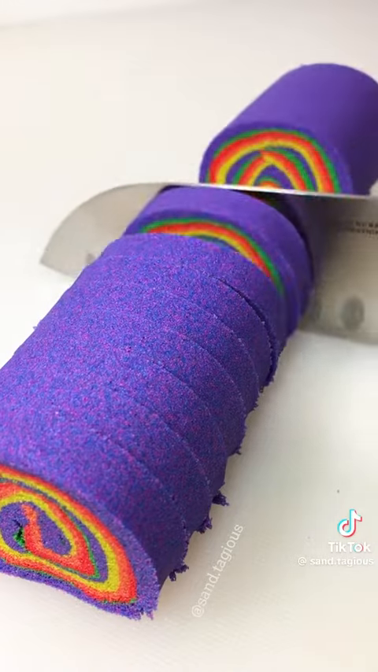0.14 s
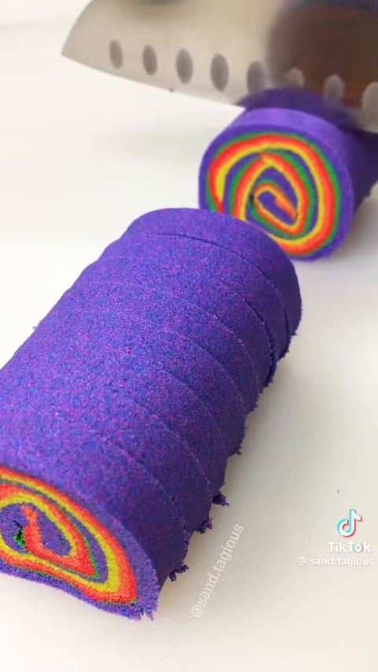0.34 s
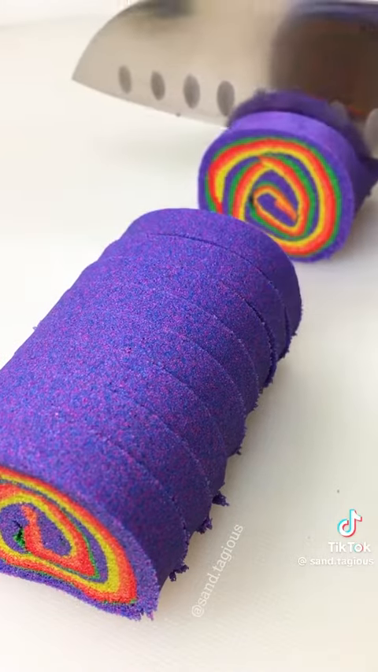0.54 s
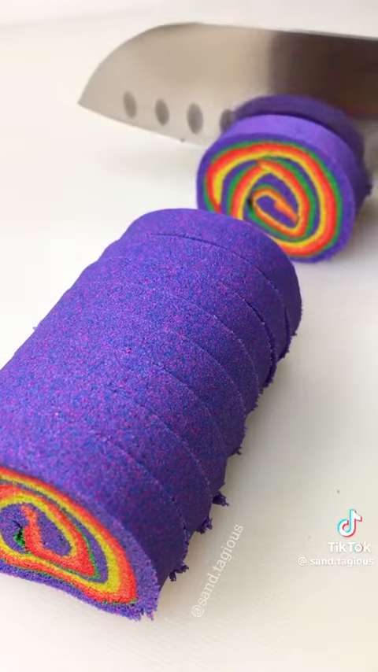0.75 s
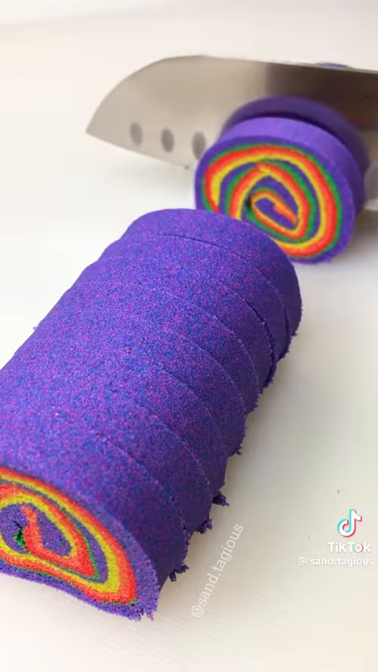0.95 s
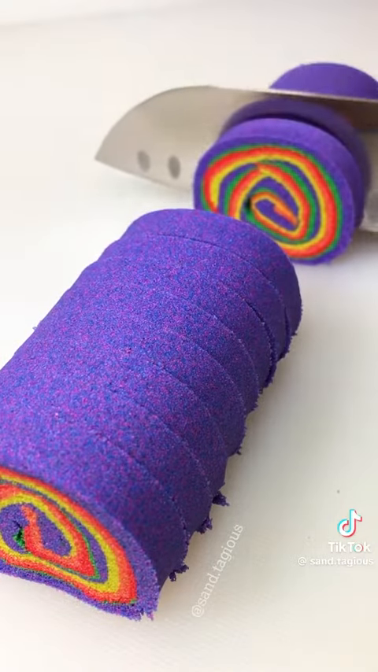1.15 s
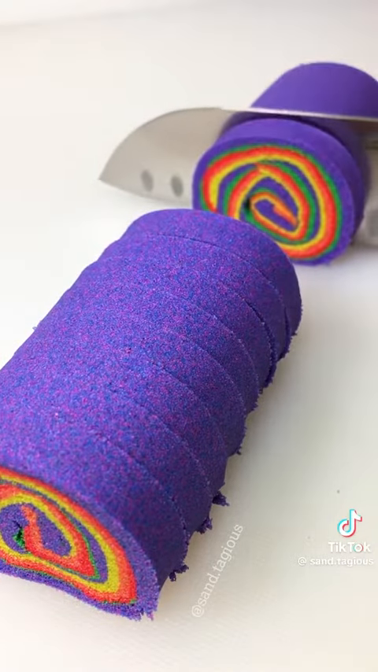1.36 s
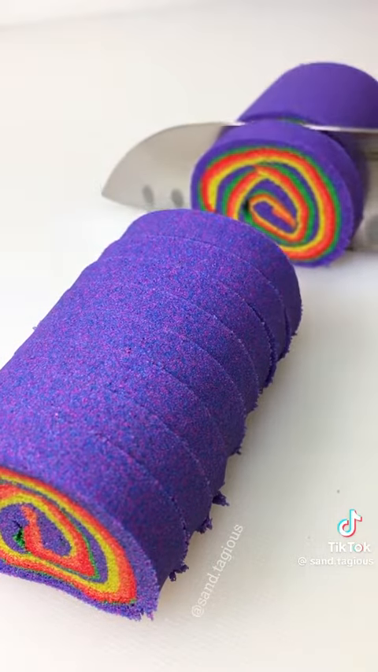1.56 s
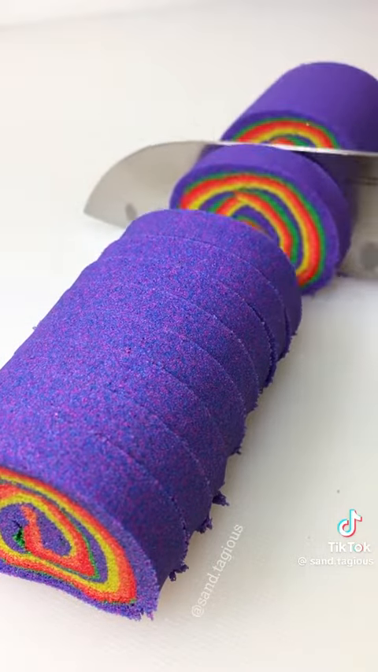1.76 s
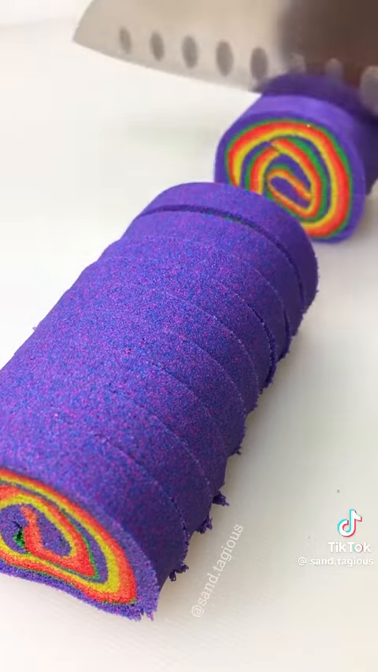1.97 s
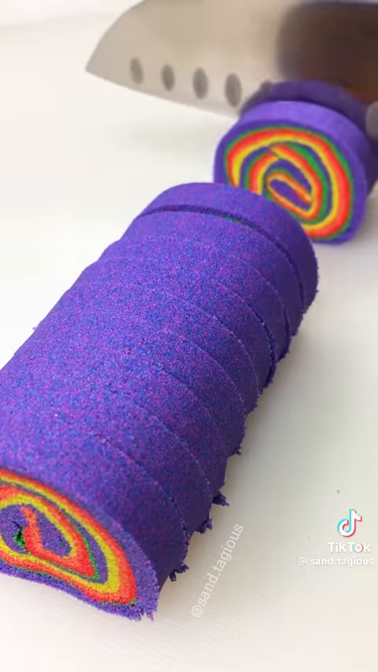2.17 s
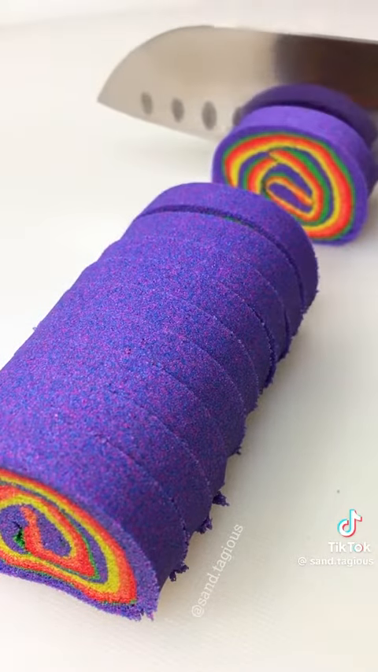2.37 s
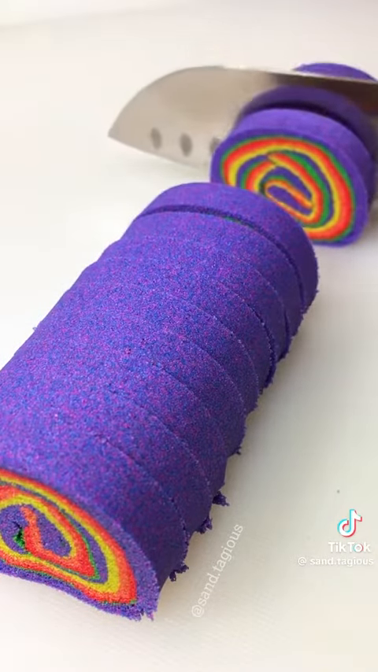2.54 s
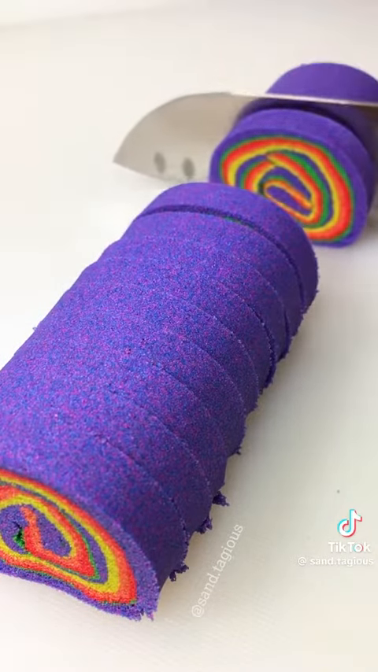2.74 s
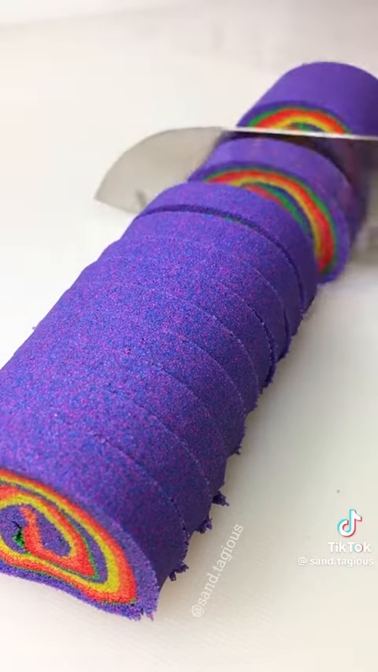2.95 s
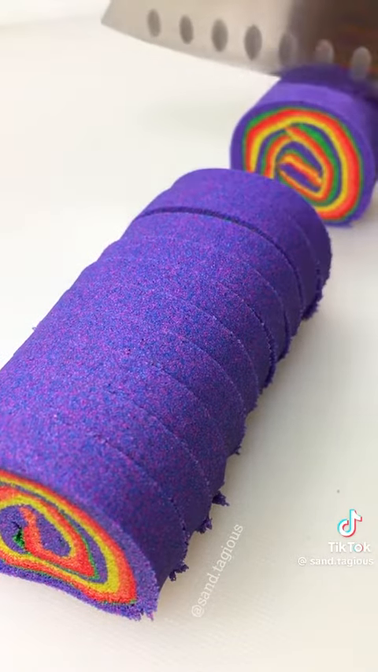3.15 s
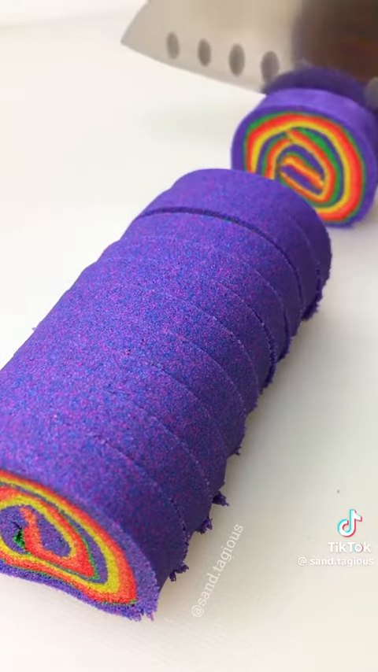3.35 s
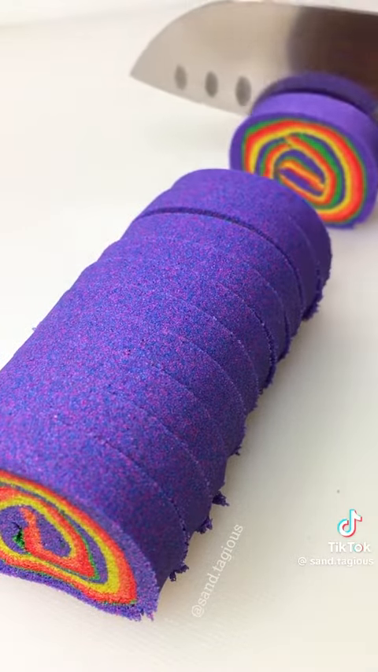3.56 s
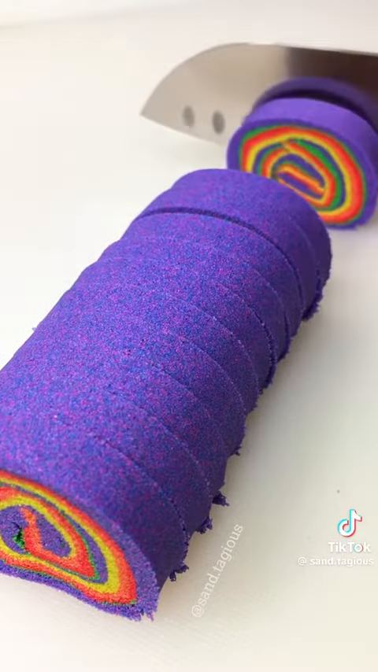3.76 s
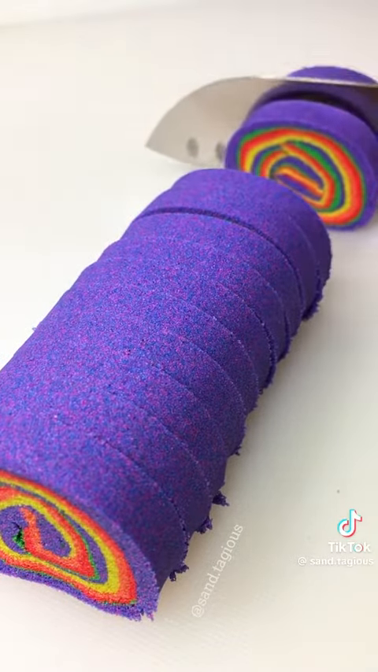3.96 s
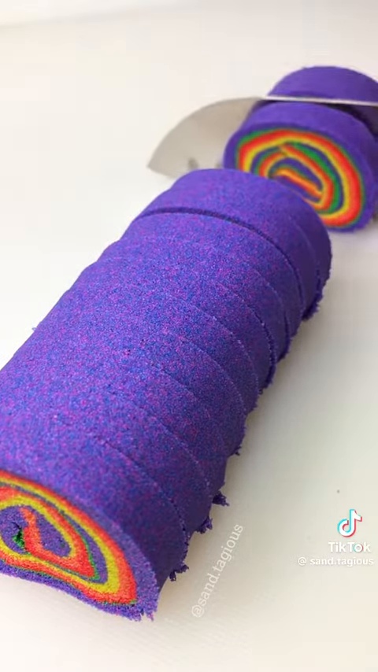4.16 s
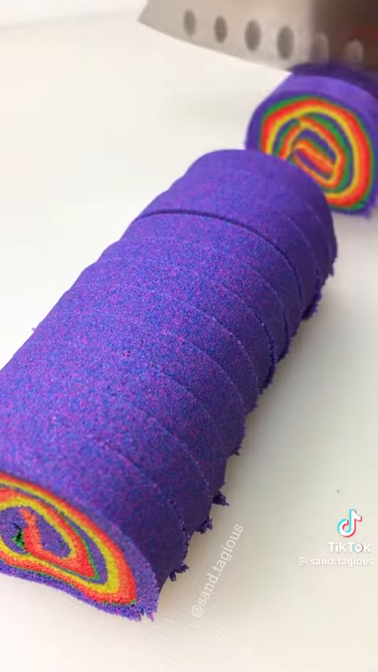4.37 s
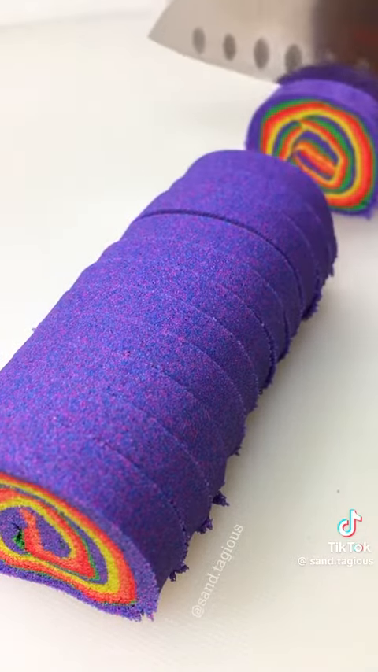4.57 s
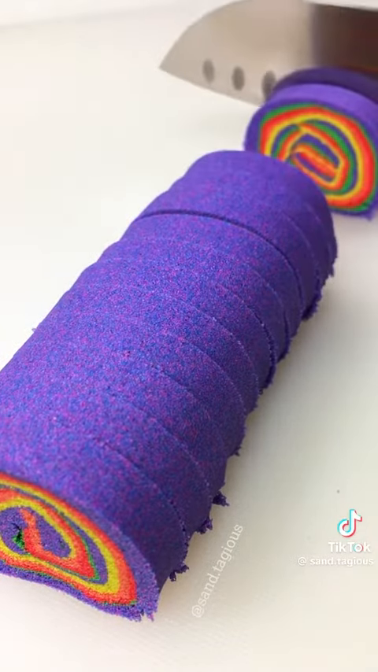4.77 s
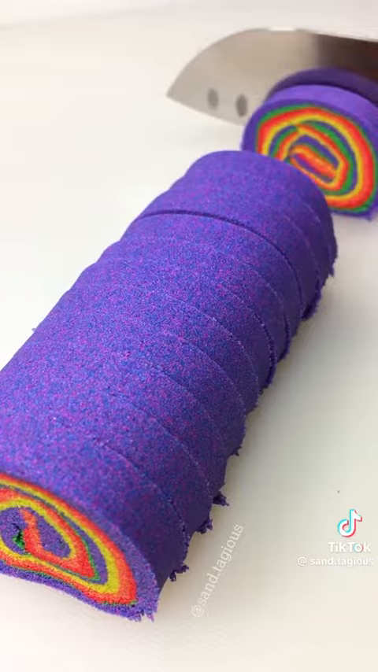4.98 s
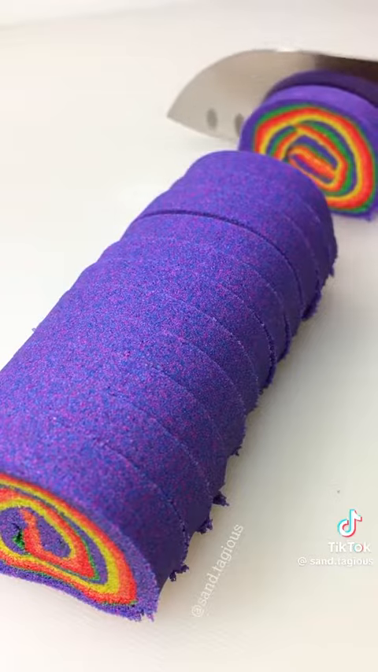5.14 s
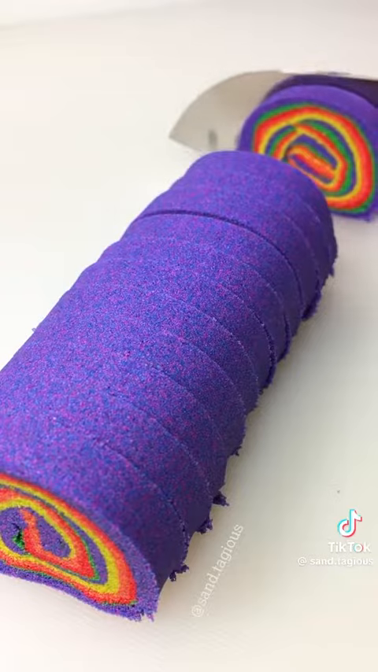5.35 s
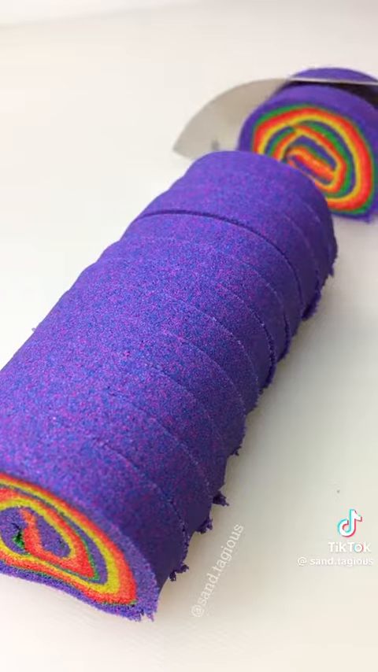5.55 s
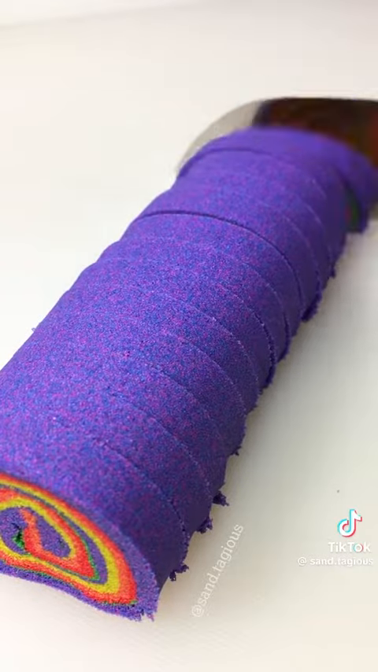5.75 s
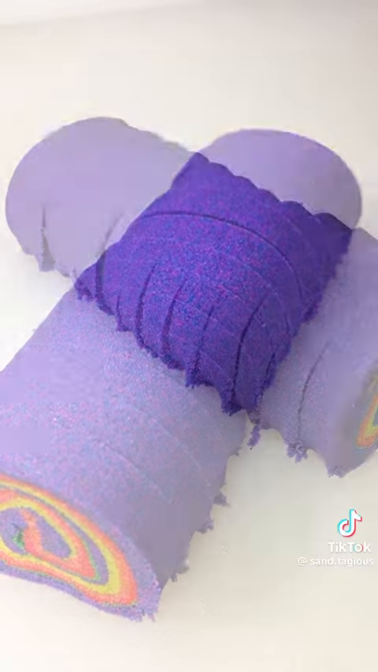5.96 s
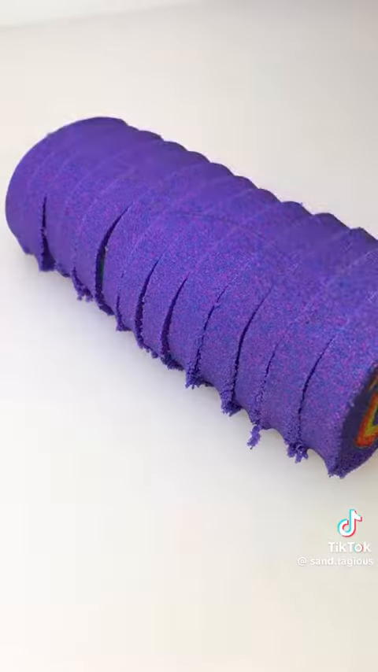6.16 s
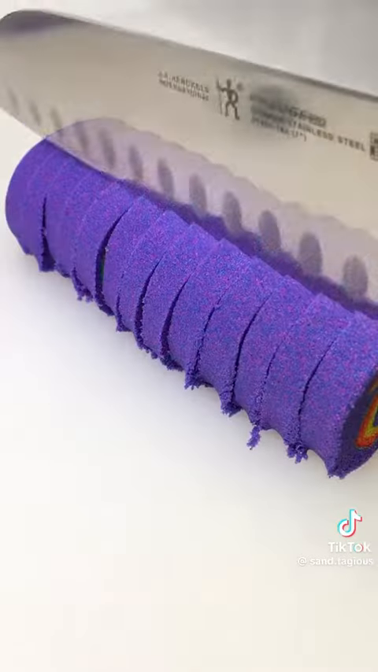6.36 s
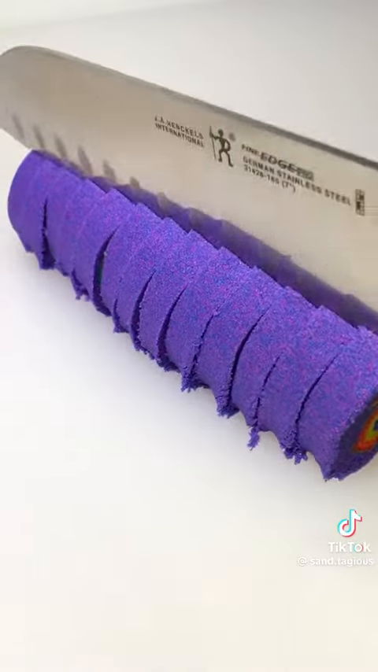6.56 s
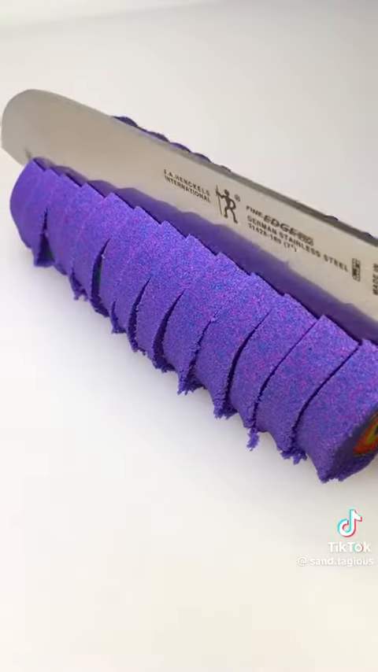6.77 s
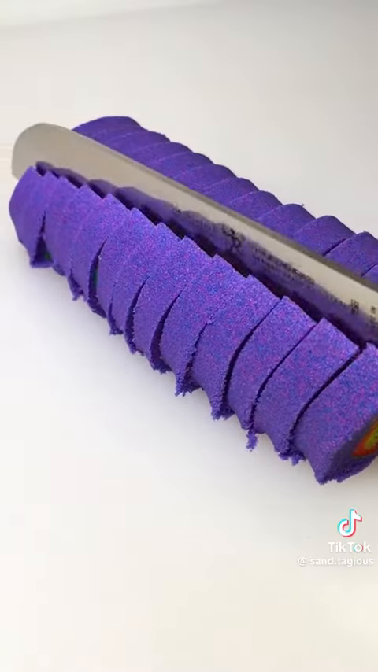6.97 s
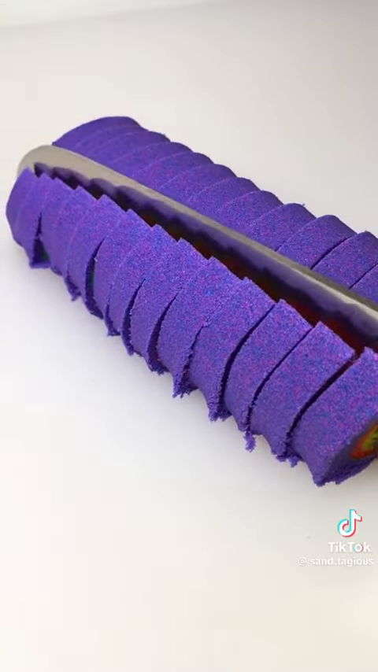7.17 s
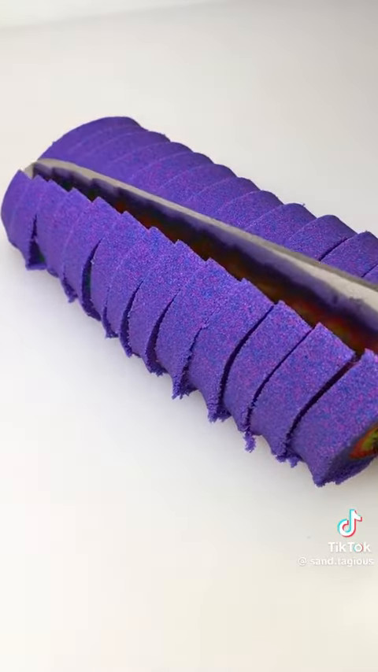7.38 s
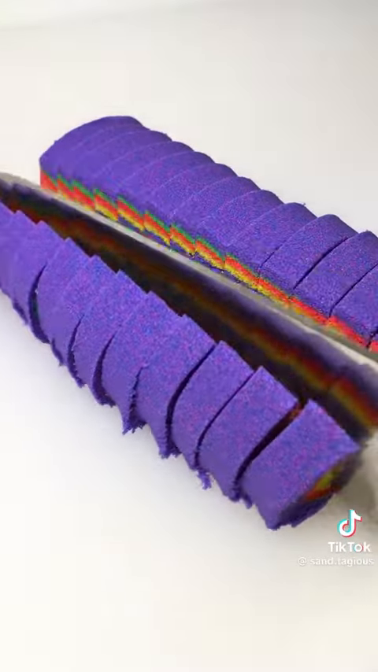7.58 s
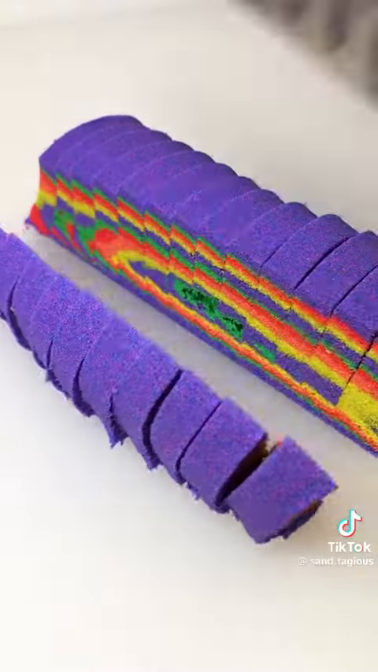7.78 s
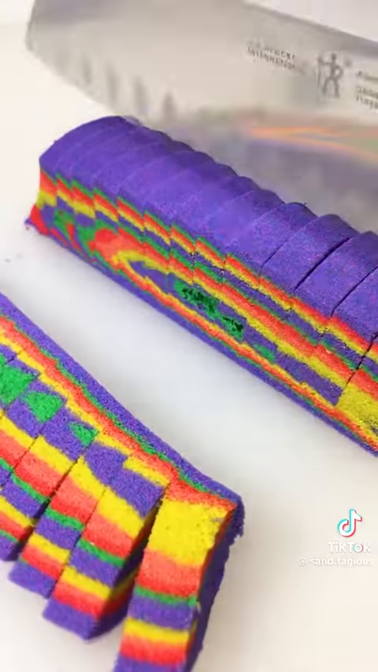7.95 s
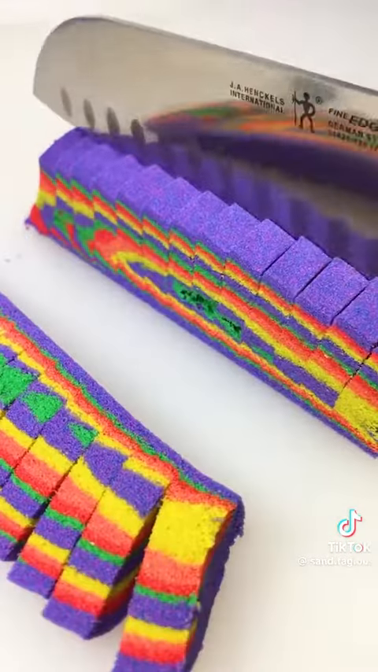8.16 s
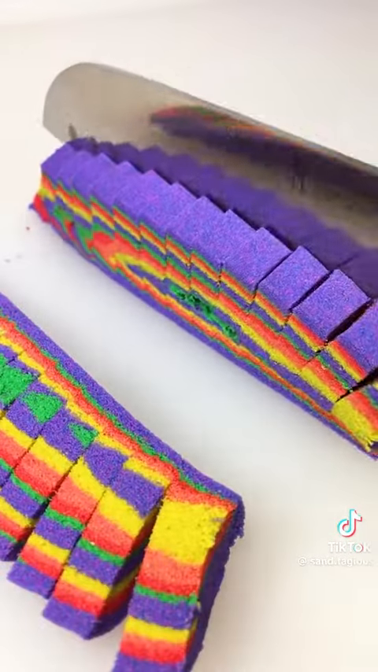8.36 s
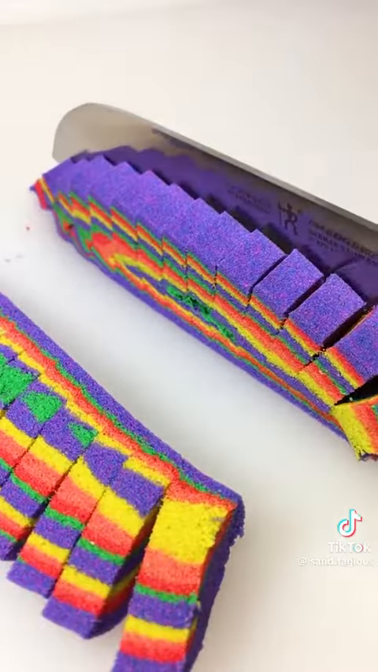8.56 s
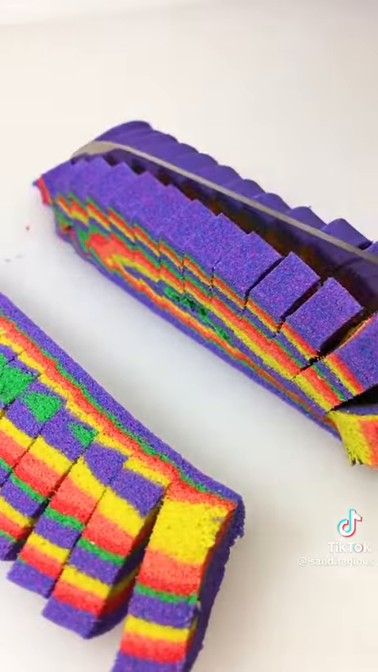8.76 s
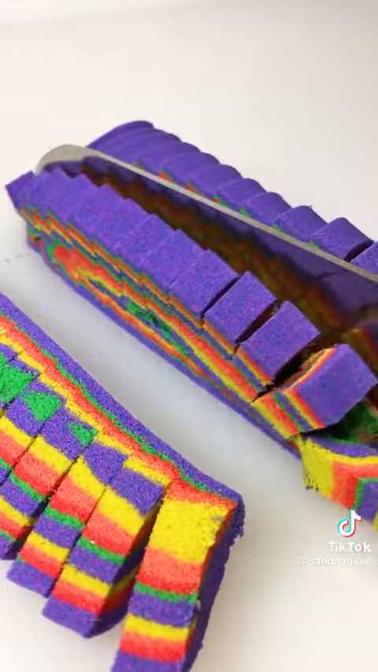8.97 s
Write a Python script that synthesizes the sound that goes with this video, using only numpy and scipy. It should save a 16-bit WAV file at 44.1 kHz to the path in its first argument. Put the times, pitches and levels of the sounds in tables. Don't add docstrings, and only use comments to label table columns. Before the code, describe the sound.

A steel knife presses through packed sand in six slow gritty crunches, with clicks, small blade knocks and soft board thuds between cuts, heard close.

```python
import sys
import numpy as np
from scipy import signal
from scipy.fft import rfft, irfft, next_fast_len
from scipy.io import wavfile
from scipy.ndimage import uniform_filter1d

SR = 44100
rng = np.random.default_rng(int(sys.argv[2]) if len(sys.argv) > 2 else 0)


def makeup_ratio(level_db):
    decades = np.asarray(level_db, float) / 20
    return 10 ** decades


def waveform_to_disk(signal):
    frames = np.transpose(np.atleast_2d(signal))
    scaled = np.clip(frames, -1, 1) * 32767
    samples = np.round(scaled).astype(np.int16)
    wavfile.write(sys.argv[1], SR, samples)


N = 397771
TURN_S = 5.66

# (centre [Hz], width [Hz], level cutting across [dB], level when knocked [dB])
BOARD_MODES = [(615, 55, -4, -20), (717, 37, -6.5, -8.5), (800, 63, -9, -15.5), (893, 84, -8, -8),
               (1050.5, 44.5, 2, 2), (1280, 26, -28.5, -4), (1500, 85, -5.5, 1), (1842, 75, -17, -10),
               (2095, 38, -14, -3), (2472, 88, -17, -14.5), (2704, 43, -20, -16), (680, 696, -14, -18),
               (827, 34, -7, -12), (1930, 52, -24.5, -17.5)]
# (centre [Hz], width [Hz], level [dB])
BLADE_MODES = [(847, 120, 14.5), (1128, 125, 14.5), (1770, 240, -3), (2230, 96, 3), (2500, 50, -4),
               (2910, 100, 1), (3300, 59, -17), (4300, 250, 2.5), (5700, 290, -4), (7100, 260, -4.5),
               (9670, 180, -7)]


def level(x):
    return x / np.sqrt(np.mean(x ** 2))


def ring(x, hz, width):
    centre = min(hz, 0.45 * SR)
    quality = hz / min(width, SR / 2.5)
    return signal.lfilter(*signal.iirpeak(centre, quality, SR), x)


def walk(rate):
    k = int(SR / rate)
    held = np.repeat(rng.standard_normal(N // k + 1), k)
    return 1.69 * uniform_filter1d(uniform_filter1d(held, k), k)[:N]


def low_pass(x, hz, edge_hz=120):
    size = next_fast_len(N + SR)
    fall = np.clip((np.fft.rfftfreq(size, 1 / SR) - hz) / edge_hz, 0, 1)
    return irfft(rfft(x, size) * np.cos(np.pi / 2 * fall) ** 4, size)[..., :N]


def rumble():
    # (time [s], level [dB])
    sway_levels = [(0.0, -47), (0.58, -43), (0.9, -52), (1.1, -38), (1.66, -38), (1.83, -47), (2.16, -42),
                   (2.38, -50), (2.59, -41.5), (3.69, -40), (5.43, -45), (5.6, -56.5), (6.48, -44),
                   (7.16, -40), (7.66, -54.5), (7.96, -41.5), (8.87, -36), (9.02, -44)]
    sway = ring(rng.standard_normal(N), 15.2, 39.0)
    sway = signal.sosfilt(signal.butter(3, 21., fs=SR, output="sos"), sway)
    building = ring(ring(rng.standard_normal(N), 44.0, 50.), 44.0, 50.)
    sway_db = np.interp(np.arange(N) / SR, *np.transpose(sway_levels))
    return makeup_ratio(sway_db) * level(sway) + makeup_ratio(-57.5) * level(building)


def room():
    noise = rng.standard_normal(N)
    return makeup_ratio(-84.5) * level(ring(noise, 150.0, 200.0)) + makeup_ratio(-90.5) * rng.standard_normal(N)


def blade():
    # (time [s], level [dB])
    pressure = [
        [(0.0, -57), (0.035, -79), (0.05, -63.5), (0.25, -78.5)],
        [(0.33, -58.5), (0.47, -54), (0.79, -53), (0.9, -49.5), (1.18, -52.5), (1.23, -52.5)],
        [(1.27, -62), (1.33, -54.5), (1.475, -57), (1.49, -81.5), (1.72, -96), (1.74, -71)],
        [(1.9, -83.5), (1.99, -57), (2.13, -52.5), (2.34, -50.5), (2.44, -46.5), (2.56, -49.5), (2.73, -57),
         (2.83, -54), (2.845, -79.5)],
        [(3.13, -87), (3.22, -61), (3.39, -54.5), (3.67, -49), (3.77, -48.5), (3.94, -55), (4.14, -56.5),
         (4.18, -78.5), (4.275, -85)],
        [(4.42, -62), (4.6, -58), (4.81, -50), (4.93, -52.5), (4.97, -61.5)],
        [(5.0, -62), (5.06, -56.5), (5.2, -60), (5.4, -59), (5.47, -65), (5.63, -84.5), (5.66, -99)],
        [(5.9, -90), (6.11, -93.5), (6.34, -62), (6.47, -49.5), (6.64, -41.5), (6.91, -46), (7.02, -49.5),
         (7.14, -49.5), (7.2, -62)],
        [(7.42, -80), (7.73, -100), (7.92, -79), (7.97, -65), (8.08, -50), (8.3, -44), (8.45, -44),
         (8.66, -46.5), (8.72, -41)],
        [(8.735, -53.5), (8.93, -75), (9.02, -63.5)],
    ]
    # (bite [s], landing [s], board over hiss at the bite [dB], at the landing [dB])
    strokes = [
        (0.33, 1.452, 13, -0.5),
        (1.953, 2.823, 15, 1.5),
        (3.283, 4.14, 14, -1),
        (4.614, 5.43, 12, 1),
        (6.295, 7.166, 6, -4.5),
        (8.123, 8.73, 4, -3),
    ]
    # (start [s], peak [s], end [s], hiss level [dB], table shake level [dB])
    grinding = [(1.539, 1.594, 1.78, -69, -48), (2.903, 2.917, 3.18, -70, -58.5),
                (5.691, 5.766, 5.58, -96, -47), (7.22, 7.291, 7.364, -38.5, -39),
                (7.38, 7.517, 8.35, -96, -60.5), (8.768, 8.794, 8.96, -43, -39)]
    bite_s, lift_s = 0.061, 0.018

    t = np.arange(N) / SR
    along = (t > TURN_S).astype(int)
    press = np.interp(t, *np.transpose(np.vstack(pressure)))

    lead = np.array((8.5, 4))[along]
    for bite, land, first_db, last_db in strokes:
        held = np.interp(t, [bite - bite_s, bite, land, land + lift_s], [0, 1, 1, 0])
        lead = lead + held * (np.interp(t, [bite, land], [first_db, last_db]) - lead)
    wood = press + lead

    shake_db_at_full, slope = np.array((-45, -39)), np.array((0.53, 0.94))
    board_full_db = -42
    shake = shake_db_at_full[along] + slope[along] * (wood - board_full_db)

    hiss, table = makeup_ratio(press), makeup_ratio(shake)
    for start, peak, end, db, shake_db in grinding:
        curve_db = np.interp(t, [start, peak, end], [-12.5, 0, -31])
        shape = np.clip((t - start) / lift_s, 0, 1) * (t < end) * makeup_ratio(curve_db)
        hiss = hiss + makeup_ratio(db) * shape
        table = table + makeup_ratio(shake_db) * np.sqrt(shape)
    return 20 * np.log10(hiss), wood, 20 * np.log10(table)


def grit(spread_db, patchy_db):
    grains_per_s = 9000
    snaps = rng.random(N) < grains_per_s / SR
    size_db = spread_db * np.minimum(rng.exponential(size=N), 4.5)
    size = makeup_ratio(size_db) * rng.standard_normal(N)
    patches = makeup_ratio(patchy_db * walk(40) + 0.15 * patchy_db * walk(9))
    return level(snaps * size * patches)


def colour(x, points, modes):
    hz, db = np.transpose([(points[0][0] / 3, points[0][1] - 22.)] + list(points))
    size = next_fast_len(N)
    f = np.fft.rfftfreq(size, 1 / SR) + 1
    db = np.interp(np.log(f), np.log(hz), db)
    for centre, width, lift in modes:
        db = db + lift / (1 + (2 * (f - centre) / width) ** 2)
    for echo_s in (0.0023, 0.0037, 0.0071):
        db = db + 1.4 * np.cos(2 * np.pi * f * echo_s)
    return level(irfft(rfft(x, size) * makeup_ratio(db), size)[:N])


def by_direction(across, along):
    return np.where(np.arange(N) < TURN_S * SR, level(across), level(along))


def board(force, modes, column, sense=-1, damping=1):
    out = 0
    for k, row in enumerate(modes):
        out = out + sense ** k * makeup_ratio(row[column]) * ring(force, row[0], damping * row[1])
    return out


def grip(x):
    # (centre [Hz], width [Hz])
    bands = [(1045, 90), (2600, 1100), (8500, 4400), (10000, 500), (14000, 3300)]
    # (from [s], lift of each of the five bands [dB] ..)
    grips = [(0.0, 2, -1.5, 1, 0.5, -1), (1.8, 1, 0, 1, 1.5, -3), (3.05, 0.5, 1.5, -0.5, -0.5, -2),
             (4.28, -1, 5, -1.5, 0, -1), (5.7, -1, -2, 0.5, -1, 0), (7.7, 2, -4, 0.5, 1, -2.5)]
    # (from [s], to [s], centre [Hz], width [Hz], lift [dB])
    seats = [(0.3, 1.5, 5310, 250, 1.5), (0.3, 1.5, 8100, 250, 2), (0.3, 1.5, 11000, 200, 1),
             (1.9, 2.84, 5760, 250, 1), (1.9, 2.84, 8940, 300, 1.5), (1.9, 2.842, 13800, 250, 3),
             (3.15, 4.17, 4300, 200, 3.5), (3.15, 4.17, 7840, 200, 2), (3.15, 4.17, 12500, 294, 2.5),
             (3.15, 4.17, 14900, 250, 1.5), (4.4, 5.47, 4840, 201, 5.5), (4.4, 5.47, 7060, 150, 2),
             (4.4, 5.47, 12600, 250, 3), (4.4, 5.47, 14100, 400, 0), (0.3, 1.25, 10000, 400, 4),
             (2.2, 2.7, 10100, 500, 2), (0.0, 0.36, 1045, 300, -3), (0.3, 1.5, 13800, 500, 0),
             (1.9, 2.84, 12300, 400, 1.5), (3.15, 3.45, 1560, 350, 3.5), (8.102, 8.436, 1590, 800, 4),
             (4.3, 4.6, 9500, 3000, -1.5)]
    rows = np.array(grips)
    cut = np.searchsorted(rows[1:, 0], np.arange(N) / SR)
    x = x + sum((makeup_ratio(rows[cut, k + 1]) - 1) * ring(x, hz, width) for k, (hz, width) in enumerate(bands))
    seated = np.zeros(N)
    for start, end, hz, width, db in seats:
        span = slice(int(start * SR), int(end * SR))
        seated[span] += (makeup_ratio(db) - 1) * ring(x[span], hz, width)
    return x + seated


def sand(hiss_db, board_db, shake_db):
    # (frequency [Hz], density [dB per Hz])
    hiss_across = [(2800, 0), (3100, -5.5), (5500, -2), (6100, -4.5), (11000, -5.5), (15500, -3.5)]
    hiss_along = [(2600, 2.5), (4700, -1.5), (5500, -3.5), (7400, -6), (11000, -6.5), (15500, -9.5)]
    # (centre [Hz], width [Hz], lift [dB])
    sheen_across = [(3333, 100, 16), (3260, 410, -5.5), (3726, 150, 7.5), (4340, 200, 2.5), (5000, 150, -2),
                    (5640, 360, 1), (6200, 200, -2.5), (6400, 110, 4.5), (7400, 180, 0.5), (8020, 400, 2.5),
                    (8940, 250, 1), (10000, 350, 1.5), (10500, 500, -2), (12200, 450, 2), (13800, 470, 2)]
    sheen_along = [(3230, 59, 3.6), (3740, 75, 2.2), (4600, 230, 4.5), (5400, 98, 3), (6780, 880, 4.8),
                   (7960, 140, 2.7), (9400, 98, 2.7), (10180, 180, 2.7)]
    # (centre [Hz], width [Hz], level [dB])
    board_along = [(630, 70, 3), (745, 18, -5.5), (818, 41, 3.5), (906, 40, -9.5), (1028, 71, 0),
                   (1338, 40, -6), (1470, 45, -4.5), (1657, 120, -12.5), (2020, 120, -10), (2330, 87, -9.5),
                   (2694, 120, -12.5), (688, 540, -7), (3580, 160, -20)]
    # (centre [Hz], width [Hz], level cutting across [dB], level cutting along [dB])
    table_modes = [(87.6, 21.7, -0.5, 0), (165, 30.2, -8, -6.5), (196.5, 41.8, -10, -10.5),
                   (317.8, 9.7, -8.5, -25), (264.5, 118, -14, -17.5)]
    # (start [s], end [s])
    crumble = [(7.245, 7.44), (8.78, 8.91)]

    grains = grit(1.5, 1.0)
    patchy_db = np.where(np.arange(N) < TURN_S * SR, 1.6, 0.5)
    push = grit(1.8, patchy_db)
    coarse = level(grit(3.4, 3.) * makeup_ratio(5 * walk(150)))
    for start, end in crumble:
        span = slice(int(start * SR), int(end * SR))
        grains[span] = coarse[span]

    hiss = by_direction(colour(grains, hiss_across, sheen_across), colour(grains, hiss_along, sheen_along))
    hiss = hiss + sum(0.17 * walk(3) * ring(hiss, hz, hz / 4) for hz in (4500, 7000, 10500, 14000))

    wood = by_direction(board(push, BOARD_MODES, column=2), board(push, board_along, column=2))

    shake = np.zeros((2, N))
    for hz, width, *db in table_modes:
        shake = shake + np.outer(makeup_ratio(db), ring(ring(push, hz, 3 * width), hz, width))
    shake = by_direction(*shake)
    return grip(makeup_ratio(hiss_db) * hiss + makeup_ratio(board_db) * wood) + makeup_ratio(shake_db) * shake


def thuds():
    # (time [s], level [dB], pitch [Hz], ring time to -60 dB [s])
    landings = [(0.024, -46, 265, 0.04), (2.814, -32.5, 83.4, 0.17), (4.145, -27, 95, 0.1),
                (4.321, -30, 178, 0.028), (5.453, -23.5, 94, 0.047), (5.7153, -47.5, 350, 0.041),
                (5.747, -39.5, 231.5, 0.066), (5.778, -41, 254, 0.1), (7.147, -25, 87.3, 0.14),
                (7.888, -26.5, 191, 0.028), (8.7211, -15, 90, 0.11), (8.7212, -19, 138, 0.027),
                (8.82, -24, 79, 0.13)]
    glide, glide_s = 0.29, 0.0035
    out, t = np.zeros(N + SR), np.arange(SR // 2) / SR
    noise = rng.standard_normal((len(landings), len(t)))
    for (s, db, hz, t60), n in zip(landings, noise):
        t60 = max(t60, 0.02)
        turns = hz * (t + glide * glide_s * (1 - np.exp(-t / glide_s)))
        low = np.sin(2 * np.pi * turns) * makeup_ratio(-60 * t / t60)
        over = 0.93 * np.sin(2 * np.pi * 2.09 * turns) * makeup_ratio(-110 * t / t60)
        slap = 0.8 * ring(ring(n * makeup_ratio(-60 * t / 0.038), 600.0, 900.), 600.0, 900.)
        swell = 1 - np.exp(-t / 0.0025)
        i = int(s * SR)
        out[i:i + len(t)] += makeup_ratio(db) * swell * (low + over + slap)
    return out[:N]


def drags():
    # (time [s], length [s], level [dB], centre [Hz], width [Hz])
    rubs = [(0.055, 0.042, -52.5, 1530, 1110), (0.079, 0.013, -52, 2070, 395),
            (0.09, 0.059, -57, 1440, 1090), (0.137, 0.06, -65, 1390, 1110), (0.176, 0.024, -60, 1700, 1010),
            (0.052, 0.029, -64, 3650, 1500), (0.124, 0.012, -56, 1360, 500), (0.21, 0.014, -60, 1500, 1200),
            (1.721, 0.032, -49.5, 1500, 6600), (1.717, 0.04, -62, 7300, 1200),
            (1.79, 0.087, -71, 1520, 800), (4.148, 0.02, -51, 5000, 3500), (4.24, 0.011, -52, 1750, 300),
            (4.195, 0.059, -58, 3000, 8000), (5.591, 0.021, -65, 2800, 3500),
            (5.596, 0.031, -56.5, 1110, 200), (5.609, 0.014, -57.5, 2760, 900),
            (5.672, .012, -81, 2410, 800), (5.761, 0.012, -37.5, 3170, 3500),
            (5.771, 0.018, -45, 2900, 3500), (5.785, 0.017, -54, 3160, 2190),
            (5.794, 0.011, -74, 4200, 900), (5.853, 0.009, -74, 2590, 1205), (5.875, 0.0106, -73, 696, 500),
            (5.89, 0.094, -86.5, 7000, 9040), (6.011, 0.05, -85.5, 11140, 9000),
            (6.067, 0.12, -80.5, 11000, 10000), (7.453, 0.015, -55, 6000, 2500),
            (7.453, 0.017, -63, 14300, 2500), (7.537, 0.076, -66, 3000, 8000),
            (7.614, 0.021, -72.5, 2980, 8000), (7.887, 0.028, -61.5, 4020, 8900),
            (8.777, 0.022, -48, 800, 400), (8.827, 0.012, -40, 1450, 900)]
    rub, out = grit(2.4, 2.5), np.zeros(N)
    steel = level(sum(makeup_ratio(db) * ring(rub, hz, width) for hz, width, db in BLADE_MODES))
    for s, length, db, hz, width in rubs:
        share = np.clip(0.65 + 0.022 * (db + 55), 0, 1)
        i, size = int(s * SR), int(length * SR)
        mix = (share * steel + (1 - share) * rub)[i:i + size]
        band = ring(ring(mix, hz, 1.2 * width), hz, 1.2 * width)
        out[i:i + size] += makeup_ratio(db) * signal.windows.tukey(size, .4) * level(band)
    return out


def contacts():
    # (time [s], crack level [dB], board knock re crack [dB], centre [Hz])
    knocks = [(1.31, -71, -7, 2180), (1.468, -28, -8, 7350), (1.5657, -25.5, -6, 5560),
              (1.6179, -18, -2, 2020), (2.831, -27, 10, 2220), (2.9106, -31, -2, 6050),
              (2.975, -45.5, -5, 2100), (3.101, -62, 4, 6300), (4.1475, -32, 18.5, 2360),
              (4.1628, -35, 5, 2610), (4.241, -38.5, -5, 1710), (4.3205, -66.5, 18, 1900),
              (5.455, -38, 15, 1590), (5.5325, -35.5, -15, 2920), (5.5846, -36, -7.5, 2800),
              (5.7155, -54, 0, 2400), (5.746, -17, -13.5, 3200), (5.977, -67.5, -12, 2600),
              (7.2413, -32, -1, 4670), (7.5249, -34.5, -6, 2500), (7.692, -79.5, 8, 2120),
              (7.8898, -45, -1, 2850), (8.7206, -48, 17.5, 750), (8.8141, -23.5, -3, 3250),
              (8.8289, -47, 12, 1500), (8.8299, -13, -7, 5940), (8.902, -26.5, -9, 6900),
              (8.946, -52, -1, 4300), (8.967, -43.5, -5, 2200)]
    # (time [s], crack level [dB], centre
    # [Hz])
    grain_snaps = [(0.863, -24, 9000), (1.545, -28, 5500), (1.5834, -17.5, 7050), (1.571, -34, 6000),
                   (1.599, -23, 2500), (1.601, -26, 5000), (1.6123, -37.5, 5000), (1.6229, -39, 5000),
                   (1.6285, -40, 5000), (1.6362, -22.5, 3300), (1.646, -36, 5600), (1.6547, -38, 2500),
                   (2.867, -48, 4000), (2.8741, -36, 2700), (4.199, -50, 6000), (4.2103, -37, 5700),
                   (4.2315, -44, 7500), (4.262, -48, 5000), (4.392, -44, 5000), (4.428, -58, 5000),
                   (4.535, -56, 5000), (4.603, -39, 8000), (5.543, -48, 5780), (5.5527, -39, 2530),
                   (5.5677, -46, 4300),
                   (6.1745, -64, 5000), (6.1943, -63.5, 5000), (6.2146, -65, 4000), (6.241, -51, 4000),
                   (6.2521, -61, 4000), (6.2698, -59, 5000), (7.1928, -34, 3100), (7.2002, -36, 6200),
                   (7.2316, -21, 4750), (7.259, -24, 4500), (7.2642, -26, 2400), (7.2665, -25, 4600),
                   (7.2708, -23, 7000), (7.2749, -9.5, 2820), (7.2818, -31, 3000), (7.296, -20, 4000),
                   (7.297, -18, 2600), (7.3012, -31, 2940), (7.3082, -26, 5000), (7.311, -28, 3130),
                   (7.3194, -26, 3300), (7.334, -33, 3000), (7.3373, -27, 6000), (7.3494, -28, 6500),
                   (7.3561, -23, 6500), (7.3603, -20.5, 6600), (7.3655, -29, 7200), (7.3774, -35, 6500),
                   (7.3848, -33, 6500), (7.397, -31, 6060), (7.4231, -50, 8000), (7.4272, -55, 8000),
                   (7.4408, -26.5, 6600), (7.4735, -68, 4300), (7.502, -72, 4800), (8.736, -20, 6000),
                   (8.7552, -31, 6000), (8.758, -28, 5000), (8.7593, -40, 6000), (8.782, -35, 5000),
                   (8.788, -34, 3950), (8.7912, -22, 4570), (8.7974, -27, 3000), (8.81, -32, 6000),
                   (8.8183, -30, 4030), (8.823, -10, 3680), (8.828, -21, 5000), (8.8351, -17, 5270),
                   (8.85, -21, 5240), (8.86, -27, 5400), (8.8703, -37, 7100), (8.8725, -29, 3000),
                   (8.8856, -19, 5900), (8.895, -36, 7500),
                   (4.2575, -54, 3000), (5.564, -52, 6000), (7.2075, -44, 5500), (7.3332, -28, 5000),
              (7.368, -34, 6000), (7.392, -44, 6450), (7.4005, -42, 12000), (7.409, -54, 8000),
              (7.415, -52, 5500), (7.437, -57, 8000), (7.4421, -32, 14500), (7.455, -52, 7000),
              (7.5249, -41, 5000), (8.7705, -52, 5000)]
    snap_knock_db, snap_treble_db = -20.5, 0.5
    rows = [(s, db, knock_db, hz, -12 + 0.03 * knock_db) for s, db, knock_db, hz in knocks]
    for s, db, hz in grain_snaps:
        rows.append((s, db, snap_knock_db, hz, snap_treble_db))
    return rows


def ticks():
    free_start_s, free_end_s, free_db = 5.52, 5.76, 17
    bounce_s, bounce_db = 0.00349, -4
    soft_hz, near_db_per_octave = 1700, 4.5
    air, force, t = np.zeros(N + SR), np.zeros(N + SR), np.arange(SR // 8) / SR
    rows = contacts()
    shape = (len(rows), len(t))
    noise = rng.standard_normal(shape) * makeup_ratio(3.4 * np.minimum(rng.exponential(size=shape), 4))
    for (s, db, knock_db, hz, treble_db), n in zip(rows, noise):
        snap = treble_db > 0
        tail = n * makeup_ratio(-60 * t / 0.042)
        ragged = (0.16 if snap else 0.31) * n * np.exp(-t / 0.00039)
        burst = -1. * (t == 0) + ragged + 0.038 * tail

        width = hz * np.clip(2.2 + treble_db / 6.4, .2, 1)
        crack = ring(ring(burst, hz, 2.4 * hz), hz, width)
        crack = crack + makeup_ratio(treble_db - 13.0) * ring(burst, 9000.0, 11000.0)
        crack = crack + snap * makeup_ratio(-5) * ring(burst, 4100.0, 15000.0)
        if free_start_s < s < free_end_s:
            crack = crack / np.abs(crack).max()
            for centre, mode_width, lift in BLADE_MODES[3:]:
                near_db = lift - near_db_per_octave * abs(np.log2(centre / hz))
                crack = crack + makeup_ratio(free_db + near_db) * ring(burst, centre, mode_width)
        crack = crack / crack[np.abs(crack).argmax()]
        i = int(s * SR)
        air[i:i + len(t)] += makeup_ratio(db) * crack * -np.sign(treble_db)

        push = np.exp(-t / .00006)
        if knock_db > 5:
            push = push + (t > bounce_s) * makeup_ratio(bounce_db) * np.exp(-np.abs(t - bounce_s) / .0001)
        push = 0.52 * push + 0.044 * n * np.exp(-t / 0.0049) + 0.086 * tail
        if knock_db > 10:
            push = 1.11 * signal.lfilter(*signal.butter(2, soft_hz, fs=SR), push)
        force[i:i + len(t)] += makeup_ratio(db + knock_db) * push

    knock = board(force[:N], BOARD_MODES, column=3, sense=0.91, damping=1.73)
    knock = signal.sosfilt(signal.butter(2, [620., 3200.], "band", fs=SR, output="sos"), knock)
    return air[:N] + makeup_ratio(23.0) * knock


def hum():
    start, end = 2.93, 3.1
    low_hz, high_hz, db = 555, 590, -64
    t = np.arange(N) / SR
    shape = np.interp(t, [start, start + 0.05, end - .015, end], [0, 1, 1, 0])
    turns = np.cumsum(np.interp(t, [start, end], [low_hz, high_hz])) / SR
    return makeup_ratio(db + 1.1 * walk(27.2)) * shape * np.sin(2 * np.pi * turns)


def scene():
    grit_top_hz, hush_top_hz = 15480, 12800
    # (start [s], end [s])
    hush = [(5.635, 5.742), (5.81, 6.005), (7.64, 7.885)]
    steady = sand(*blade()) + drags() + room()
    t = np.arange(N) / SR
    hushed = sum((t > start) & (t < end) for start, end in hush)
    steady = np.where(hushed, low_pass(steady, hush_top_hz), steady)
    sharp = ticks()
    top = makeup_ratio(-33.5) * sharp + low_pass(sharp, grit_top_hz, edge_hz=450)
    return (low_pass(steady, grit_top_hz) + top + thuds() + hum() + rumble())[None]


def band_limit(x):
    return signal.sosfilt(signal.butter(12, 16820, fs=SR, output="sos"), x)


def record(dry):
    top_hz = 16800
    return band_limit(low_pass(dry, top_hz))


dry = scene()
out = record(dry)
waveform_to_disk(out)
```